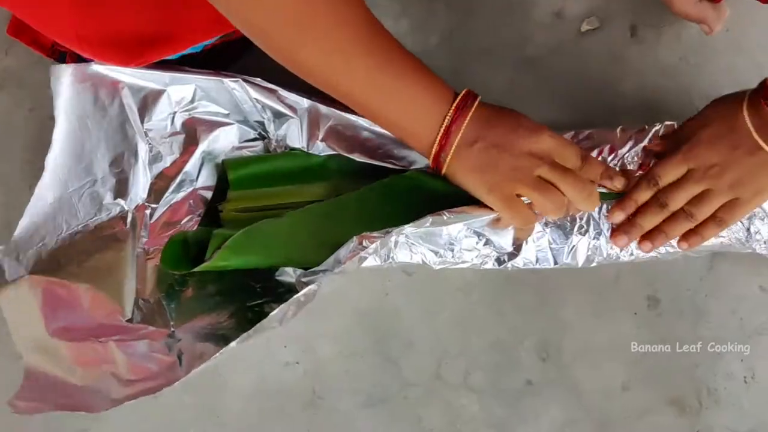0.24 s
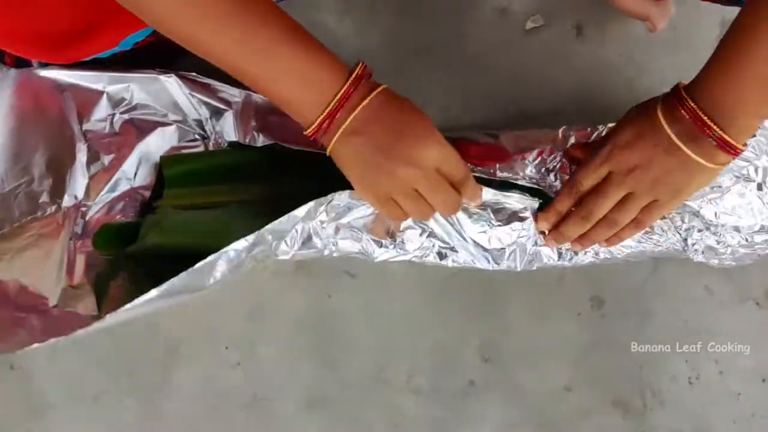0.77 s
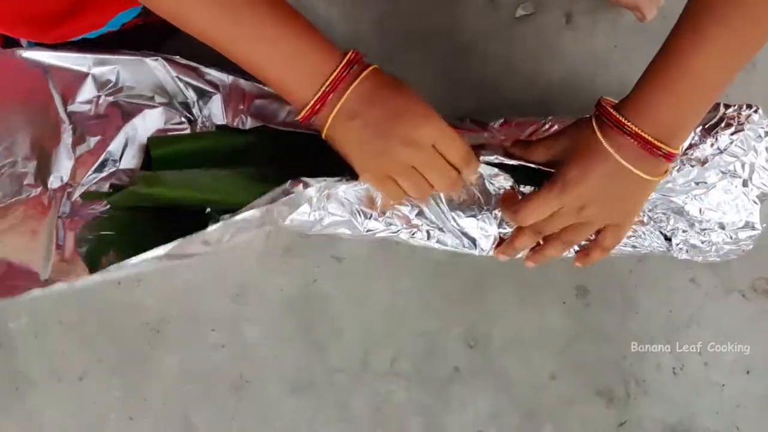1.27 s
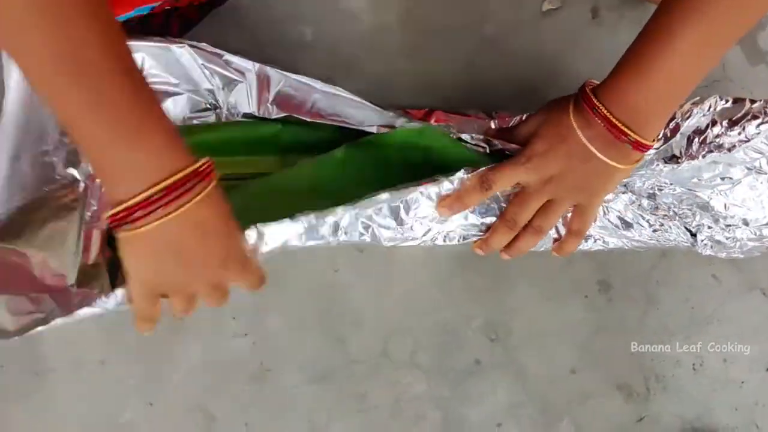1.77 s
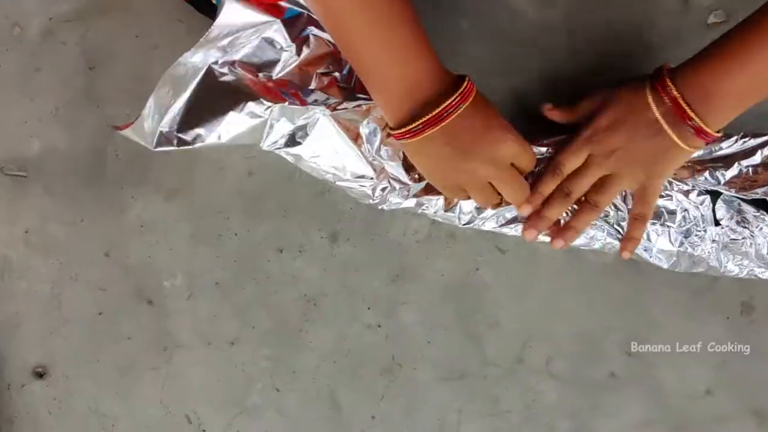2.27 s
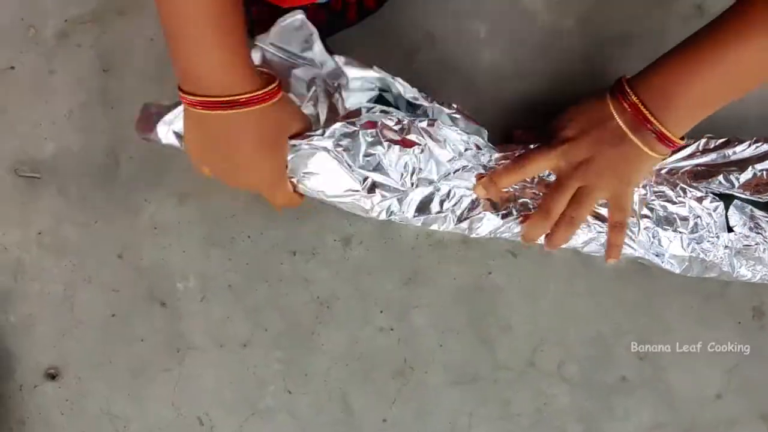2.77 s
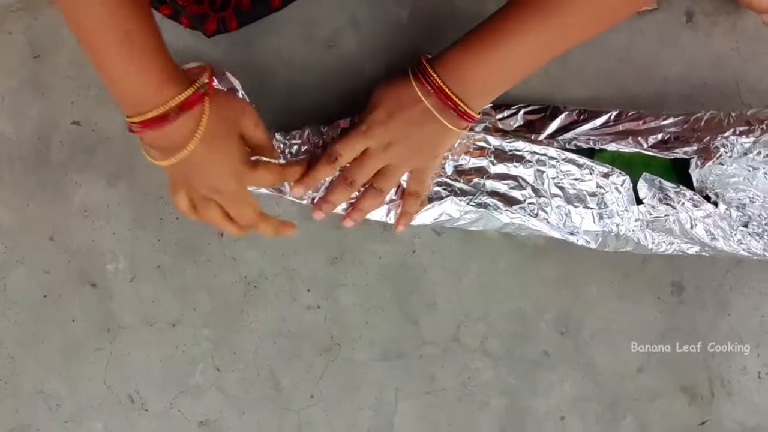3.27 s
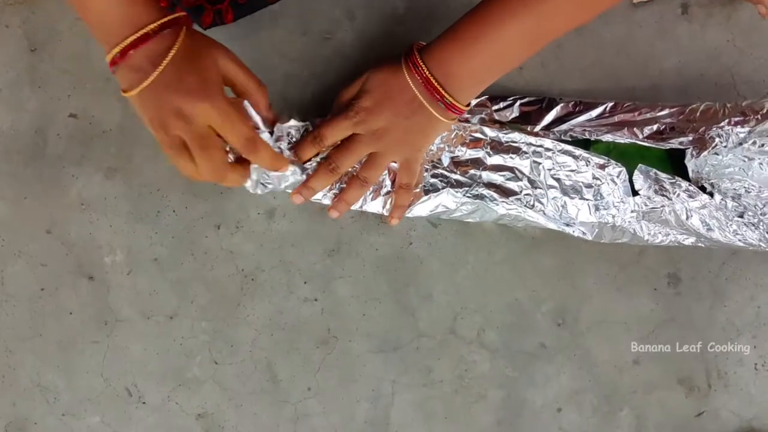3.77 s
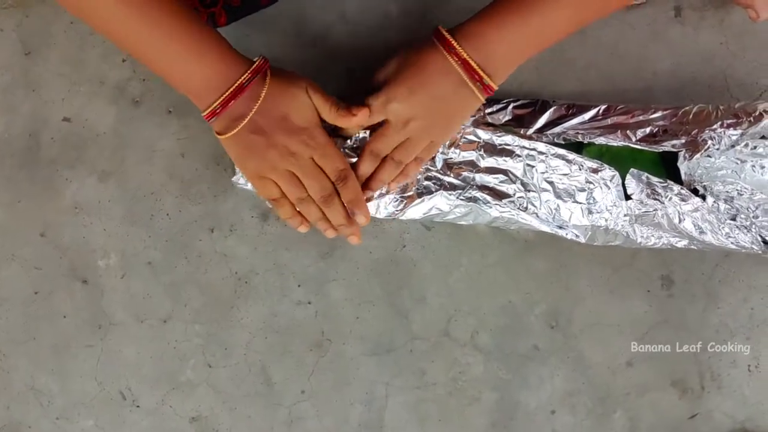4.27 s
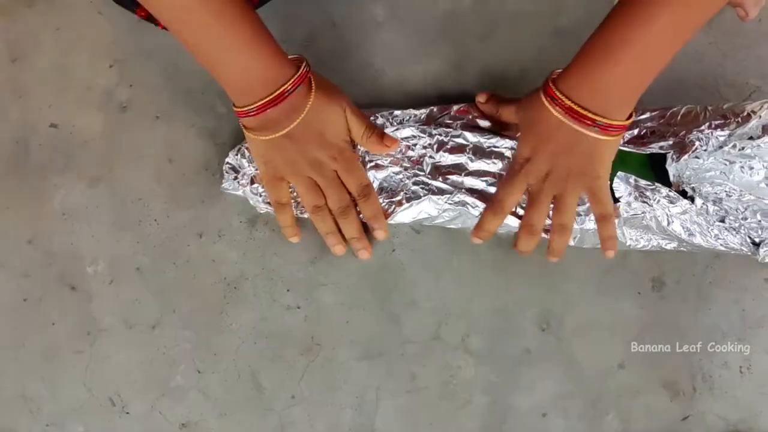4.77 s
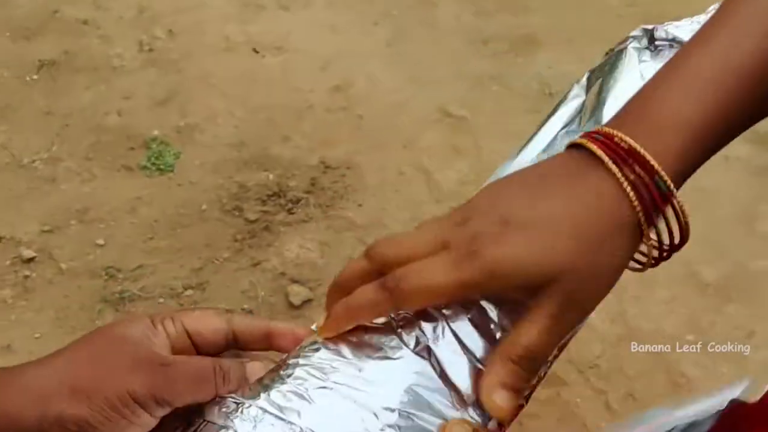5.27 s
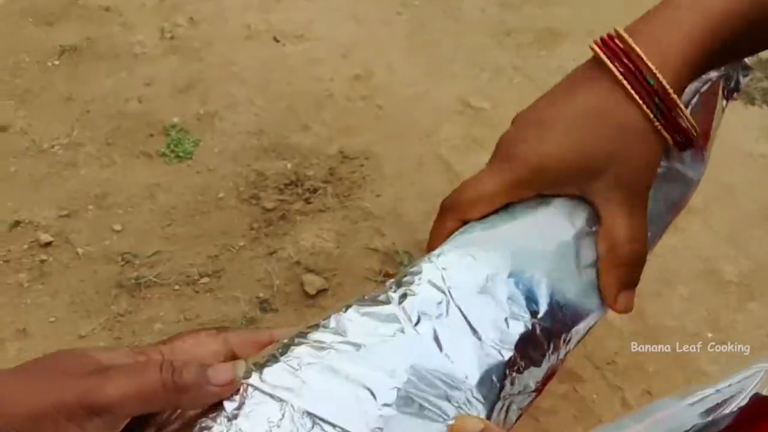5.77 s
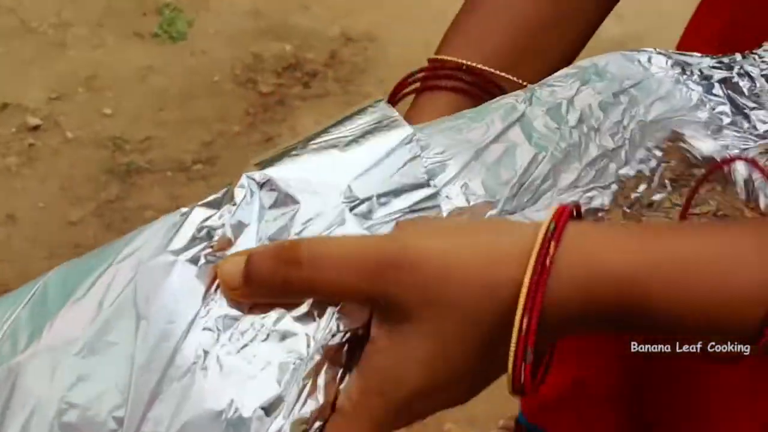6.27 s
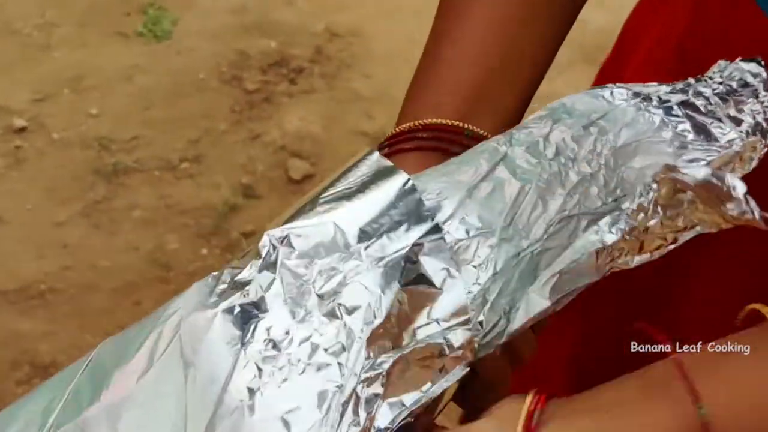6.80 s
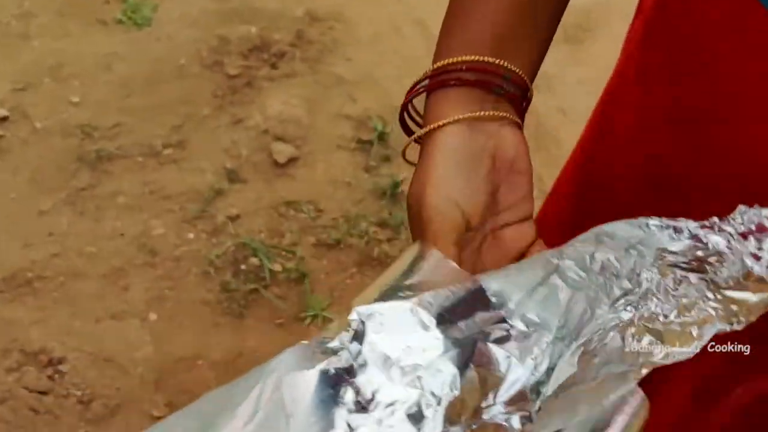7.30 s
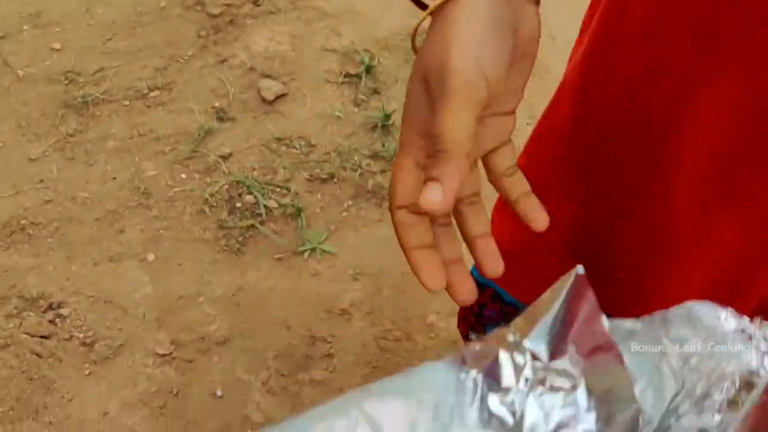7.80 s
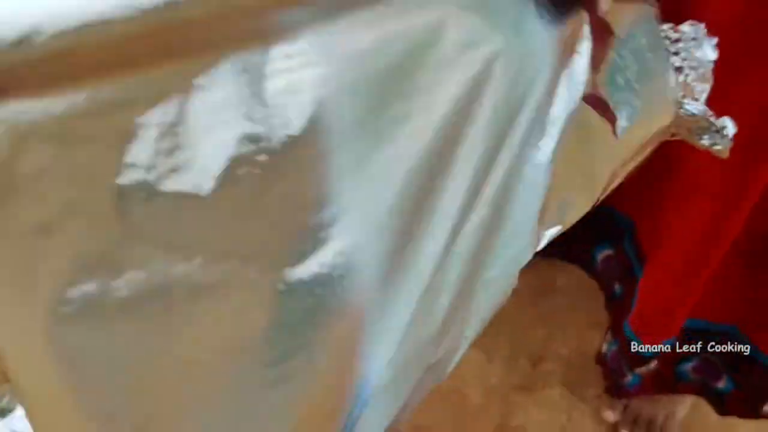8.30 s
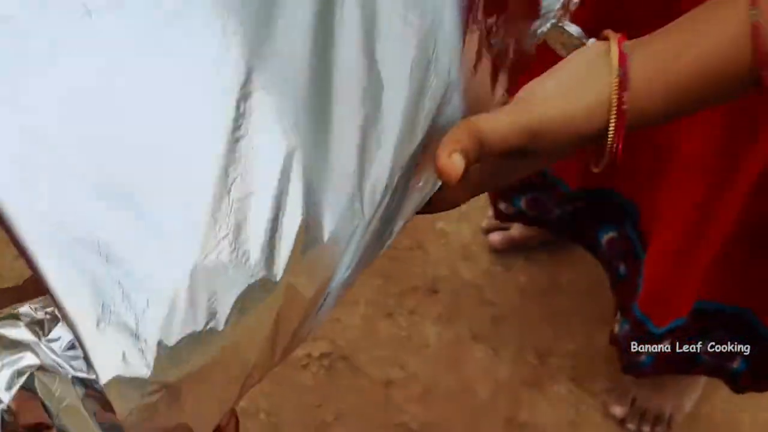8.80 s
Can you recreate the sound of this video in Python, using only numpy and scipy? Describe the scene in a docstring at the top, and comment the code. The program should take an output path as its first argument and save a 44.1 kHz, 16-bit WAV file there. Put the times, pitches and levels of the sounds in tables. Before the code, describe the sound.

Hands fold and press aluminium foil round a leaf-wrapped parcel on a concrete floor, very close in stereo: fine bright sizzle, papery crackle, sharp buckles and small pops, easing to faint ticks. Just before five seconds it cuts to a larger sheet in an open dirt yard, louder and drier, with harsh snaps, soft bumps and flaps. Faint rumble, hiss and a distant machine's hum lie beneath.

```python
"""First, close over a concrete floor: hands fold and press aluminium foil round a leaf-wrapped parcel.
Avalanches of tiny snaps sizzle in the creases, panels crackle lower, ridges buckle and broad panels pop.
At 4.836 s it changes abruptly to a larger sheet over bare earth in a yard, with dull bumps and flaps.
Two close microphone ports, each with its own treble resonance, hear the foil.
A faint outdoor rumble, hiss and wavering hum of a distant machine run under both places."""
import sys
import numpy as np
from scipy import signal
from scipy.fft import rfft, irfft
from scipy.io import wavfile
from scipy.ndimage import uniform_filter1d

SR = 44100
rng = np.random.default_rng(int(sys.argv[2]) if len(sys.argv) > 2 else 0)


def unload_wav(signal):
    """Save mono or channel-first audio to the path in sys.argv[1] as 16-bit WAV at rate SR, clipped to [-1, 1]."""
    wavfile.write(
        sys.argv[1],
        SR,
        np.round(np.clip(np.atleast_2d(signal).T, -1, 1) * 32767).astype(np.int16),
    )


N = 399092
TIME = np.arange(N) / SR

# The fingers press, fold or gather the foil; levels before each place's trim:
# (start t/s, length t/s, crease level/dB, panel level/dB)
PRESSES = [(-0.038, 0.051, -30, -40), (0.046, 0.18, -30, -39.5), (0.276, 0.15, -42, -47),
           (0.421, 0.16, -33.5, -43), (0.602, 0.22, -29.5, -39), (0.875, 0.18, -33, -40.3),
           (1.018, 0.075, -27.5, -38), (1.09, 0.17, -34.5, -40.5), (1.297, 0.26, -32, -41),
           (1.577, 0.23, -32, -42), (1.828, 0.3, -30.5, -38.1), (2.121, 0.11, -28.5, -37.2),
           (2.257, 0.12, -34, -39.3), (2.417, 0.16, -34.5, -41), (2.629, 0.064, -29.5, -36.6),
           (2.676, 0.21, -25.5, -33.0), (2.91, 0.054, -32, -39.5), (2.976, 0.22, -33.7, -40.2),
           (3.222, 0.2, -36, -44), (3.46, 0.11, -33, -41), (3.678, 0.24, -33, -42), (3.9, 0.21, -34.5, -44),
           (4.137, 0.39, -39, -46.5), (4.59, 0.047, -39.5, -49), (4.786, 0.045, -40, -51),
           (4.8, 0.08, -24, -37), (4.913, 0.11, -28, -39.9), (5.065, 0.019, -28.5, -39.5),
           (5.192, 0.014, -31.8, -44.6), (5.264, 0.15, -34, -43.5), (5.403, 0.16, -29.5, -40.5),
           (5.642, 0.17, -36.5, -47.5), (5.783, 0.2, -25, -40.1), (5.979, 0.042, -19, -36.3),
           (6.074, 0.085, -31, -45), (6.128, 0.081, -24.5, -40.5), (6.247, 0.38, -27, -40),
           (6.691, 0.23, -30, -41.5), (6.968, 0.094, -28, -38), (7.073, 0.33, -23, -35),
           (7.386, 0.039, -21.5, -33.5), (7.494, 0.34, -23.5, -35), (7.909, 0.29, -22.5, -36.5),
           (8.19, 0.31, -22, -35), (8.427, 0.065, -18, -36.5), (8.556, 0.19, -24, -40),
           (8.75, 0.26, -23.4, -37), (8.954, 0.057, -21.5, -40)]
# Depth of the panels' crackle, thinner as the sheet is held taut: (t/s, level/dB)
GRIP = [(0, -4), (1.7, -2), (2.3, -3), (2.85, 1.5), (3.4, -1.5), (3.7, 0.5), (4.7, -3), (5.3, -0.5),
        (5.6, -6.5), (6.1, -1.5), (6.4, -4.5), (8.05, -5), (8.3, -14), (8.53, -4), (8.8, -7), (9.05, -3)]
# A whole ridge buckles; peak before trim: (t/s, peak level/dB, length t/s)
BUCKLES = [(0.0971, -15, 0.002), (0.4258, -22, 0.003), (0.4867, -15, 0.005), (0.5453, -15, 0.004),
           (0.7579, -13, 0.01), (1.0474, -18, 0.01), (1.6135, -14, 0.006), (1.671, -15, 0.01),
           (2.5043, -16, 0.003), (2.7195, -12, 0.01), (3.0343, -18, 0.01), (3.2775, -20, 0.005),
           (3.591, -17, 0.003), (3.6721, -20, 0.002), (3.9568, -15, 0.008), (4.398, -16, 0.001),
           (4.4495, -21, 0.002), (4.8369, -11, 0.01), (4.85, -10, 0.003), (5.1839, -22, 0.005),
           (5.2366, -18, 0.01), (5.2959, -18, 0.007), (5.3739, -16, 0.003), (5.8166, -13, 0.01),
           (5.9968, -10, 0.008), (6.0271, -6, 0.01), (6.1678, -9, 0.004), (6.668, -13, 0.003),
           (6.6993, -14, 0.002), (6.8537, -11, 0.005), (7.0391, -10, 0.01), (7.4078, -9, 0.01),
           (7.5976, -9, 0.01), (7.8479, -9, 0.009), (8.2421, -8, 0.01), (8.7719, -7, 0.001)]
# One broad panel pops through; level before trim and decay: (t/s, level/dB, f/Hz)
POPS = [(0.664, -23, 2970), (1.009, -27, 2050), (1.198, -25, 520), (3.104, -21, 1820), (3.759, -27, 872),
        (4.06, -22, 2170), (4.1, -22, 2220), (4.219, -28, 940)]
# The parcel is bumped or the sheet flaps; level before trim and decay: (t/s, level/dB, f/Hz)
BUMPS = [(4.855, -26, 175), (4.879, -24, 275), (5.019, -32, 670), (7.13, -29, 260), (7.195, -26, 640),
         (7.273, -25, 520), (7.549, -28, 186), (7.622, -25, 245), (7.734, -27, 799), (7.834, -24, 230),
         (7.845, -22, 310), (7.955, -27, 713), (7.992, -28, 300), (8.785, -27, 296)]
# Colour of the foil at the two ports, over concrete and in the yard:
# (f/Hz, left level/dB, right level/dB)
FLOOR_COLOUR = [(199, -16, -8.5), (380, -21.5, -36), (540, -16.5, -13), (1030, -19.5, -19.5),
                (1530, -16.5, -13.5), (2680, -17, -11), (3900, -10.5, -12.5), (4980, -8.5, -11.5),
                (5970, 1, -8), (6920, -9, -10), (8360, -16.5, -0.5), (10300, -20, -15.5), (13500, -18, -11),
                (15600, -24, -8.5)]
YARD_COLOUR = [(186, -14.5, -17), (320, -17, -17), (418, -20, -23), (536, -21, -20), (1130, -18.5, -17.5),
               (2040, -22.5, -19.5), (2650, -16.5, -13.5), (3600, -14.5, -10.5), (4930, -8.5, -5),
               (6020, 0.5, -2), (7180, -7, -2), (8420, -16, 2), (10430, -17.5, -8), (12700, -20.5, -9),
               (15400, -9, -12.5)]
# Spectral shape of the outdoor air, before its overall level: (f/Hz, relative level/dB)
AIR = [(15, -15), (30, -0.5), (42, -0.5), (80, -5), (160, -8.5), (280, -15.5), (550, -26.5), (1400, -23),
       (5000, -48), (15000, -56)]
# Level of a distant machine's hum: (t/s, level/dB)
HUM = [(0, -60), (3, -57), (3.4, -53.5), (5.5, -56), (6.1, -51.5), (9, -52)]

YARD_S = 4.836  # the place changes here
PRESS_ATTACK_S, RELAX_DB_PER_S = .04, 112  # the strain builds, holds while the fingers push, then relaxes
SLIP_HZ, SLIP_DB = 23, 1.0  # the fingers push unevenly
SETTLE_DB = -55.5  # creases go on ticking faintly between presses, before trim
WANDER_HZ, WANDER_DB = 1.1, 1.0  # the hands move left and right over the parcel
STICK_S, STICK_DB = 0.014, 1.5  # a ridge takes up the strain, so the foil is quieter before it buckles
NARROW_HZ = 430  # the ports are close together, so the foil's bass is alike at both
AIR_DB = -43
HUM_HZ, HUM_WAVER_HZ, HUM_FLUTTER = 132.2, 1.5, .25
EDGE_HZ = 15800  # upper edge of the recorder's band


def foil(presses, place, per_s, spread_db, surge_db, avalanche_db, crease_db, panel_db, low_hz, ground_echo):
    """Creases and panels share one strain, which surges with the fingers and lets go in avalanches."""
    creasing, bending = pressing(presses)
    depth_db = np.interp(TIME, *np.transpose(GRIP))
    pan_db = WANDER_DB * drift(WANDER_HZ)
    strain_db = surge_db * drift(52) + avalanche_db * drift(155)
    sizzle = creases(strain_db, place, per_s, spread_db)
    sizzle = sizzle * gain_of(np.array([[1], [-1]]) * pan_db / 2)
    flexing = panels(strain_db, place, low_hz, depth_db, ground_echo)
    return sizzle * creasing * gain_of(crease_db) + flexing * bending * gain_of(panel_db)


def pressing(rows):
    """Gains of creases and panels: each press rises, holds and relaxes; overlaps add in power."""
    power = np.zeros((2, N))
    power[0] = gain_of(SETTLE_DB) ** 2
    for start, length, *levels_db in rows:
        span = slice(max(int(start * SR), 0), int((start + length + 1) * SR))
        age = TIME[span] - start
        rise = np.clip(age / PRESS_ATTACK_S, 0, 1)
        relaxing = gain_of(-RELAX_DB_PER_S * np.maximum(age - length, 0))
        power[:, span] += np.outer(gain_of(levels_db), rise * relaxing) ** 2
    return np.sqrt(power) * gain_of(SLIP_DB * drift(SLIP_HZ))


def creases(strain_db, place, per_s, spread_db):
    """Thousands of tiny folds a second give way: the bright sizzle."""
    at, sizes = crackle(strain_db, per_s, spread_db)
    ticks = snaps(at, sizes, 2620, 16100, cycles=1.43, tick=1.0, spread_s=.00013, shiver_s=0.0016, size=96)
    ticks = shifting(ticks, patchy_db=2.4)
    ticks = place(band(ticks, 3200, "highpass", order=3))
    return steadied(ticks, 3200, 17600, 0.08)


def panels(strain_db, place, low_hz, depth_db, ground_echo):
    """Flat panels pop through with a lower crackle, deeper where the grip moves more of the sheet."""
    at, sizes = crackle(strain_db, per_s=1400, spread_db=1.5)
    pops = snaps(at, sizes, 234, 3284, cycles=3.2, tick=1.0, spread_s=.0001, shiver_s=0.0016)
    pops = band(band(pops, 2890, "lowpass", order=3), low_hz, "highpass")
    pops = pops + ground_echo * np.roll(pops, round(0.002298 * SR), axis=1)  # broad panels beam at the ground
    pops = shifting(pops, patchy_db=2.0)
    deep = band(pops, 1850, "lowpass", order=1)
    thin = pops - deep
    tilted = deep * gain_of(depth_db) + thin / gain_of(depth_db)
    return steadied(place(tilted), 450, 3660, 0.057)


def crackle(strain_db, per_s, spread_db):
    """Times and sizes of random snaps: many small, few large, larger where the strain runs high."""
    chance = rng.random(N)
    size = np.minimum(rng.exponential(1, N), 4)
    at = np.flatnonzero(chance < per_s / SR)
    return at, gain_of(strain_db[at] + spread_db * size[at])


def snaps(at, sizes, lo_hz, hi_hz, cycles, tick, spread_s, shiver_s, shiver=1.84, size=256):
    """Each snap is a tick, a few cycles of its own facet and a sheet shiver, from its own direction."""
    pitch, damping, sign, side, lag = rng.standard_normal((len(at), 5)).T
    hz = lo_hz + (hi_hz - lo_hz) * (1 + np.tanh(pitch)) / 2
    turns = hz[:, None] * np.arange(size) / SR
    decay = np.exp(-turns / (cycles * np.exp(damping / 2))[:, None])
    ring = decay * np.sin(2 * np.pi * turns)
    ring /= np.linalg.norm(ring, axis=1, keepdims=True)
    ring[:, 0] += tick
    fade = np.exp(-TIME[:size] / shiver_s)
    fade /= np.linalg.norm(fade)
    ports = []
    for way in (-1, 1):  # direction gives each port its own arrival and level
        start = np.maximum(at + np.round(way * lag * spread_s * SR / 2).astype(int), 0)
        heard = ring + shiver * rng.standard_normal(ring.shape) * fade
        heard *= (sizes * np.sign(sign) * gain_of(way * 2 * side))[:, None]
        samples = start[:, None] + np.arange(size)
        ports.append(np.bincount(samples.ravel(), heard.ravel(), N)[:N])
    return np.array(ports)


def shifting(x, patchy_db, size=256):
    """The sheet's resonances wander as its shape changes, so each fold has its own colour."""
    spectra = signal.stft(x, nperseg=size)[2]
    patches = rng.standard_normal(spectra.shape)
    patches = uniform_filter1d(patches, size=3, axis=1)  # across pitch
    patches = evened(uniform_filter1d(patches, size=30, axis=2))  # along time
    return signal.istft(spectra * gain_of(patchy_db * patches), nperseg=size)[1][:, :N]


def buckles(rows, place, level_db, count=22):
    """A ridge gives way in a quick run of snaps that swells and dies, weak ones ahead and behind."""
    s, peak_db, length = np.transpose(rows)
    progress = (np.arange(count) + rng.random((len(s), count))) / count
    at = ((s[:, None] + (1.6 * progress - .3) * length[:, None]) * SR).astype(int)
    swell = np.sin(np.pi * progress)
    run = snaps(at.ravel(), swell.ravel(), 1500, 14000, cycles=2, tick=.5, spread_s=.00012, shiver_s=.001)
    run = place(band(run, 1070, "highpass"))
    mid = abs(run.mean(0))
    height = np.array([mid[first:last + 64].max() for first, last in at[:, [0, -1]]])
    return run * np.interp(TIME, s, gain_of(peak_db + level_db) / height)


def sticking():
    """Gain of the crackle, which falls while a ridge holds and returns as it buckles."""
    dip_db = np.zeros(N)
    for s, _, _ in BUCKLES:
        wait = s - TIME[:int(s * SR)]
        dip_db[:len(wait)] += STICK_DB * np.exp(-(wait / STICK_S) ** 2)
    return gain_of(-dip_db)


def knocks(rows, level_db, t60, rustle):
    """A few dull cycles, roughened by the foil and leaves that shake with them."""
    out, t = np.zeros(N + SR), TIME[:SR // 8]
    for s, db, hz in rows:
        shake = evened(band(rng.standard_normal(len(t)), [hz / 1.63, hz * 1.46], "bandpass"))
        body = evened(np.sin(2 * np.pi * hz * t) + rustle * shake)
        attack = 1 - np.exp(-10 * hz * t / np.pi)
        decay = gain_of(db + level_db - 60 * t / t60)
        out[round(s * SR):][:len(t)] += decay * attack * body
    return out[:N]


def concrete(x):
    """Close over a hard floor, with walls near by."""
    return coloured(space(x, (.00172, .00227), (.08, .1), tail_db=-4, t60=.15), FLOOR_COLOUR)


def yard(x):
    """Over bare earth, nearly dry."""
    return coloured(space(x, (.0031, .0026), (.04, .04), tail_db=-4, t60=.11), YARD_COLOUR)


def space(x, echo_s, echo, tail_db, t60, size=128):
    """One ground echo at each port and a short diffuse tail that never repeats: the foil keeps moving."""
    spectra = signal.stft(x, nperseg=size)[2]
    keep = gain_of(-60 * size / SR / t60)  # share of the power that lasts from one frame to the next
    power = signal.lfilter([0, 0, 1 - keep], [1, -keep], abs(spectra) ** 2, axis=2)
    phases = np.exp(2j * np.pi * rng.random(power.shape))
    tail = signal.istft(np.sqrt(power) * phases, nperseg=size)[1][:, :N]
    tail = band(tail, 500, "highpass", order=3)
    ground = [share * np.pad(port, (round(s * SR), 0))[:N] for port, s, share in zip(x, echo_s, echo)]
    return x + np.array(ground) + gain_of(tail_db) * tail


def coloured(x, table, size=2048):
    """Causal filter for each port, so that a snap rings only after it happens."""
    hz = abs(np.fft.fftfreq(size, 1 / SR))
    log_gain = np.log(gain_of([read(table, hz, axis=1), read(table, hz, axis=2)]))
    taps = np.fft.ifft(np.exp(np.conj(signal.hilbert(log_gain)))).real  # minimum phase
    return signal.oaconvolve(x, taps, axes=1)[:, :N]


def background():
    """Rumble alike at both ports, hiss unlike, and a wavering hum."""
    hz = np.fft.rfftfreq(N, 1 / SR)
    shared, *own = rfft(rng.standard_normal((3, N)))
    same = .98 / (1 + (hz / 800) ** 2)  # share of the power common to both ports
    air = (np.sqrt(same) * shared + np.sqrt(1 - same) * np.array(own)) * gain_of(read(AIR, hz))
    turns = np.cumsum(HUM_HZ + HUM_WAVER_HZ * drift(11)) / SR
    hum = evened(np.sin(2 * np.pi * turns) * (1 + HUM_FLUTTER * drift(2.6)))
    hum_gain = gain_of(np.interp(TIME, *np.transpose(HUM)))
    return gain_of(AIR_DB) * evened(irfft(air, N)) + hum_gain * hum


def drift(hz):
    """Slow chance of unit RMS, changing up to about hz times a second."""
    f = np.fft.rfftfreq(N, 1 / SR)
    return evened(irfft(rfft(rng.standard_normal(N)) / (1 + (f / hz) ** 4), N))


def steadied(x, lo_hz, hi_hz, span_s):
    """Scales x so that its running level in a band is about one."""
    size = max(int(span_s * SR), 2)
    power = band(x.mean(0), [lo_hz, hi_hz], "bandpass", order=4) ** 2
    smooth = uniform_filter1d(uniform_filter1d(power, size), size)
    return x / np.sqrt(abs(smooth) + 1e-12)


def gain_of(db):
    """Amplitude ratio of a level in dB."""
    return 10 ** (np.asarray(db) / 20)


def evened(x):
    """Scales x to unit RMS."""
    return x / np.sqrt(np.mean(x ** 2) + 1e-20)


def read(points, hz, axis=1):
    """Reads a table column at any frequency, along log frequency."""
    points = np.array(points)
    return np.interp(np.log(hz + 1), np.log(points[:, 0] + 1), points[:, axis])


def band(x, hz, kind, order=2):
    """Butterworth filter, running forward in time."""
    sos = signal.butter(order, np.clip(hz, 1, SR / 2 - 1), kind, fs=SR, output="sos")
    return signal.sosfilt(sos, x)


def scene():
    """Folding on the concrete, then an abrupt change to the larger sheet in the yard."""
    stick = sticking()
    floor_presses = [row for row in PRESSES if row[0] + row[1] < YARD_S]
    yard_presses = [row for row in PRESSES if row[0] + row[1] >= YARD_S]
    folding = stick * foil(floor_presses, concrete, per_s=2400, spread_db=1.5, surge_db=1.0,
                           avalanche_db=0.5, crease_db=.5, panel_db=0.4, low_hz=307, ground_echo=0.2)
    folding += buckles([row for row in BUCKLES if row[0] < YARD_S], concrete, level_db=.5)
    handling = stick * foil(yard_presses, yard, per_s=3000, spread_db=0.0, surge_db=0.67,
                            avalanche_db=0.43, crease_db=0.62, panel_db=0.4, low_hz=184, ground_echo=0.016)
    handling += buckles([row for row in BUCKLES if row[0] >= YARD_S], yard, level_db=.5)
    sheet = np.where(TIME < YARD_S, folding, handling)
    mid = sheet.mean(0)
    sides = band(sheet - mid, NARROW_HZ, "highpass", order=1)
    bumps = knocks(BUMPS, level_db=-8, t60=.085, rustle=2)
    pops = knocks(POPS, level_db=-7.5, t60=.04, rustle=1.5)
    return mid + sides + bumps + pops + background()


def record(dry):
    """The loudest snaps are rounded off; then the recorder's band limit."""
    rounded = .9 * np.tanh(dry / .9)
    taps = signal.firwin(601, EDGE_HZ, window=("kaiser", 9), fs=SR)
    return signal.oaconvolve(rounded, taps[None], "same")


dry = scene()
out = record(dry)
unload_wav(out)
```